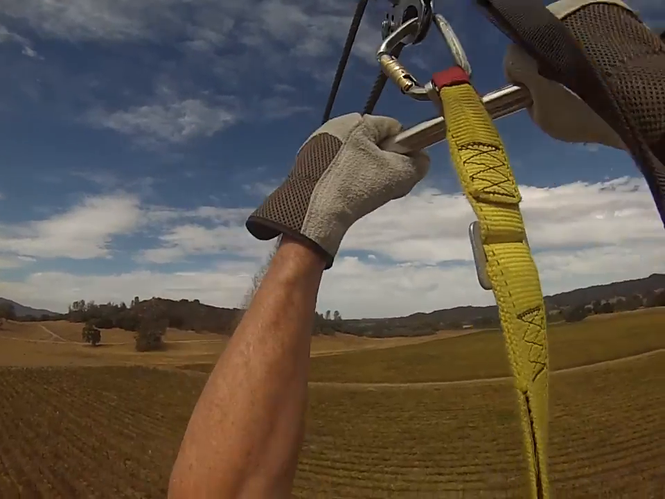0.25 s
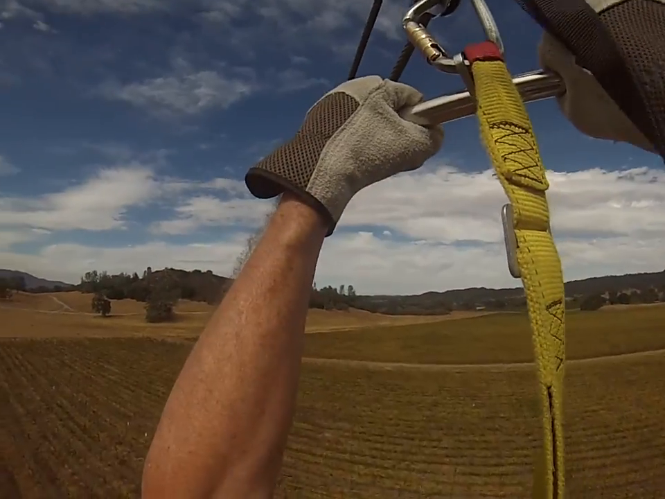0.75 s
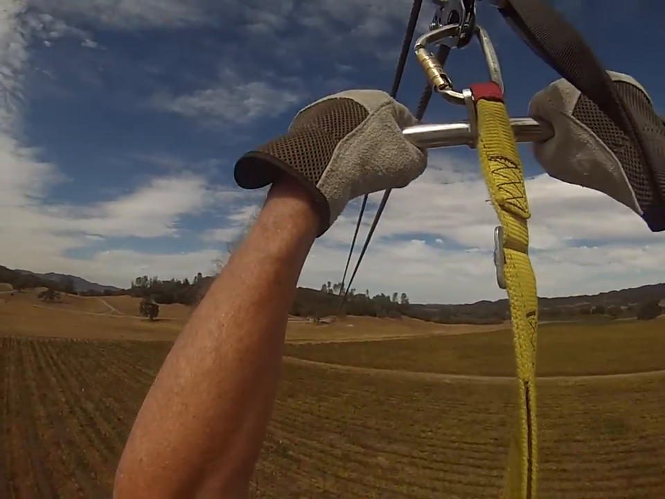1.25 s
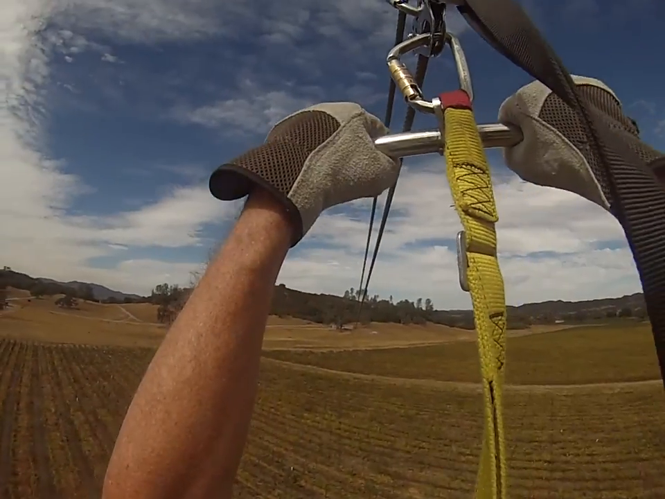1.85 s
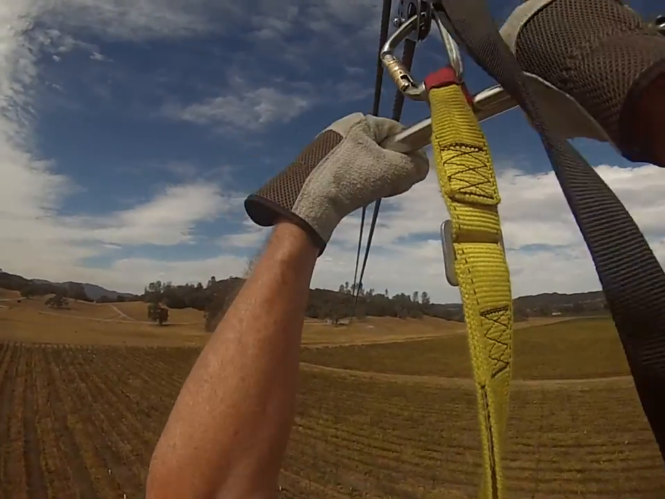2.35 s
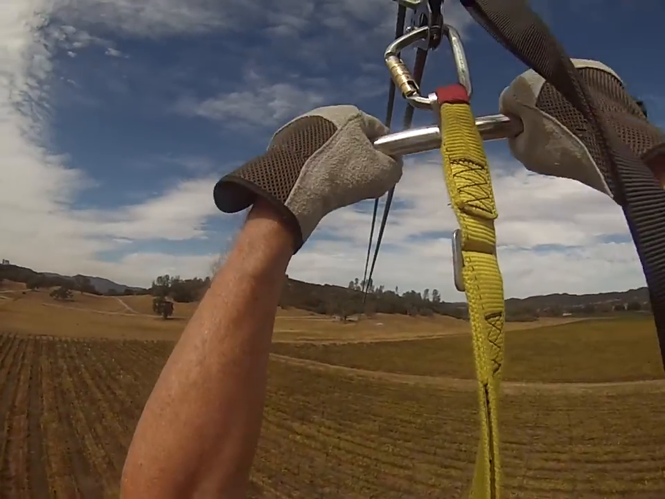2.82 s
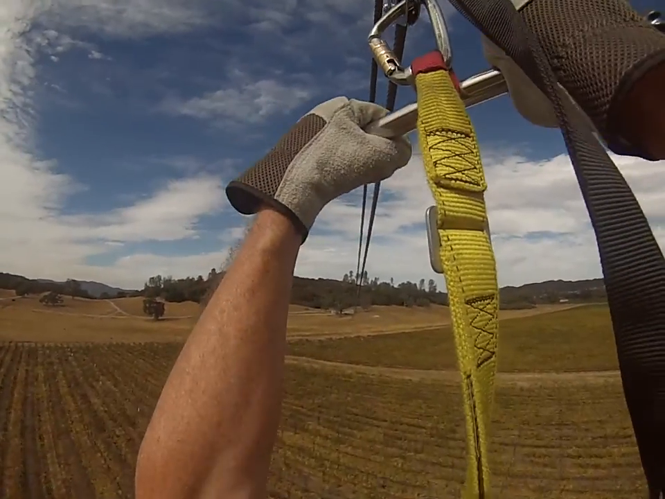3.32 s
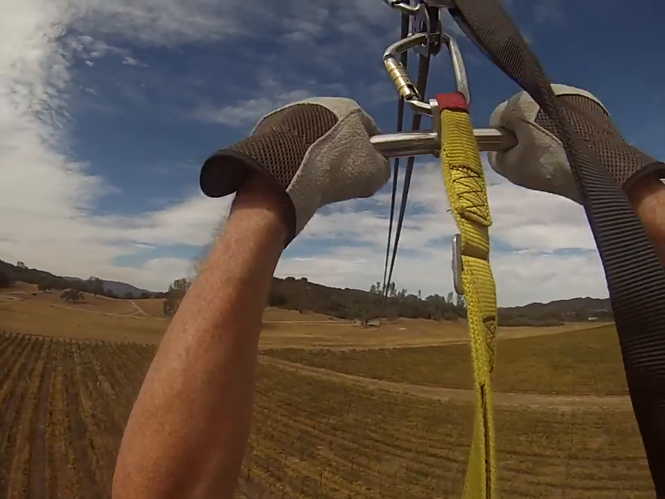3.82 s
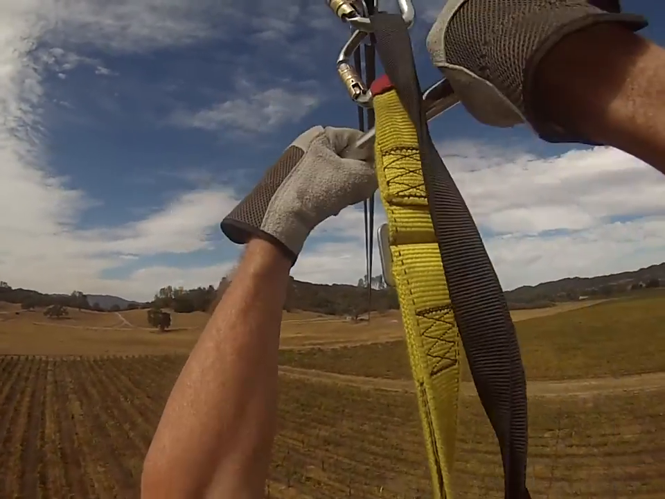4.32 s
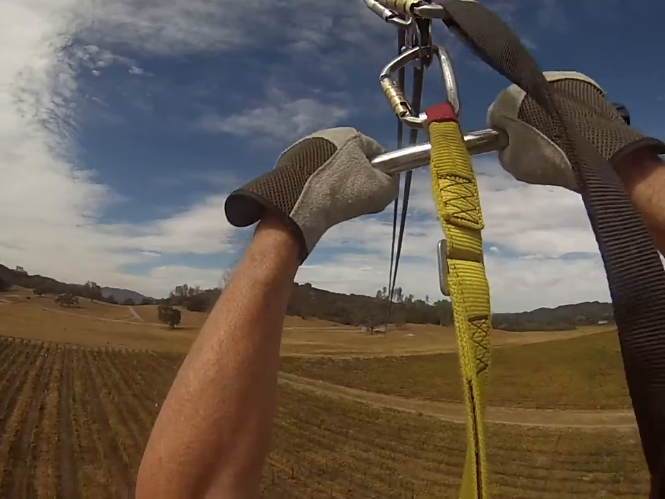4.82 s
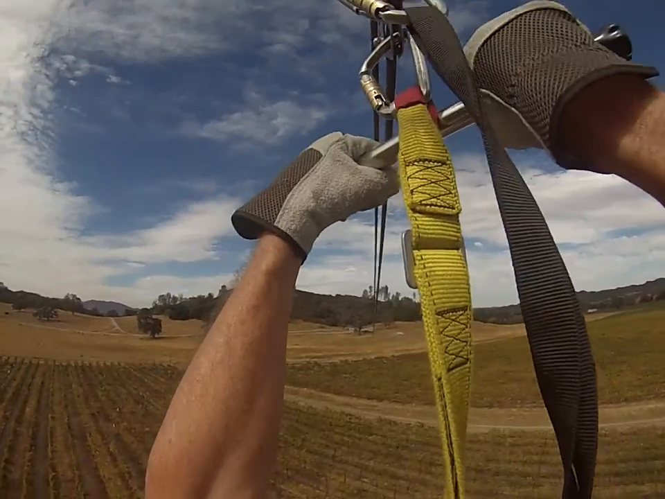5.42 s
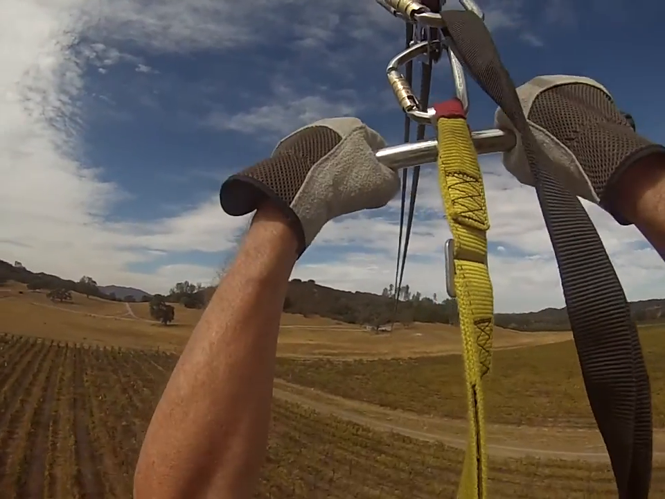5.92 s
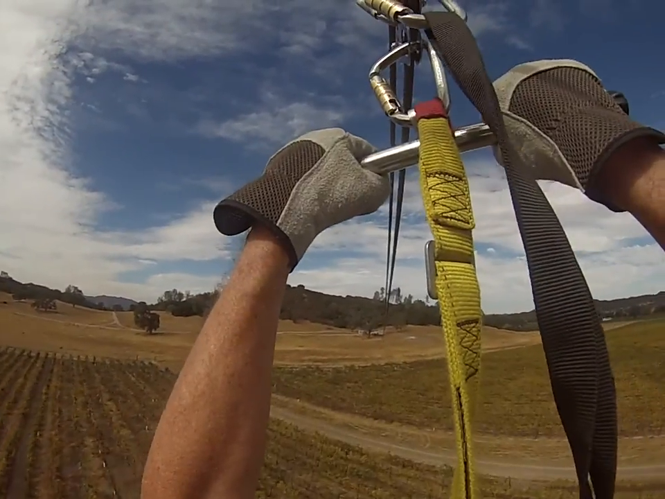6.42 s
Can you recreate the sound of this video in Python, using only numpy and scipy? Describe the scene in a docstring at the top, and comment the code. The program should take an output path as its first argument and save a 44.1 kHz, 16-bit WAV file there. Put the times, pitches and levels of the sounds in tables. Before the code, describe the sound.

Fast zip-line pulleys hiss steadily along a steel cable while wind rumbles and rasps on the microphone; one sharp knock briefly dips everything.

```python
"""Steel cable, heard from a helmet camera in a plastic case: a zip-line trolley runs fast along it.
Noise through resonances and a broad scrape makes the pulley hiss; strand-rate harmonics, a faint whine.
Short airy swishes flare over it. Wind noise rumbles on the case and rings its shell into a rasp.
One sharp knock, a noise crack plus decaying sines, makes the limiter duck everything for about a second."""
import sys
import numpy as np
from scipy import signal
from scipy.fft import rfft, irfft
from scipy.io import wavfile
from scipy.ndimage import uniform_filter1d, minimum_filter1d

SR = 44100
rng = np.random.default_rng(int(sys.argv[2]) if len(sys.argv) > 2 else 0)


def waveform_to_disk(signal):
    """Save audio, clipped to [-1, 1], as 16-bit WAV at the path in sys.argv[1]."""
    frames = np.transpose(np.atleast_2d(signal))
    scaled = np.clip(frames, -1, 1) * 32767
    samples = np.round(scaled).astype(np.int16)
    wavfile.write(sys.argv[1], SR, samples)


N = 293706
T = np.arange(N) / SR  # s


def undb(db):
    """Decibels to amplitude gain."""
    return 10 ** (np.asarray(db) / 20)


def unit(x):
    """Scale to rms 1."""
    return x / np.sqrt(np.mean(x ** 2))


def noise():
    """White noise, rms about 1."""
    return rng.standard_normal(N)


def curves(rows):
    """Each column of a time table, joined by straight lines."""
    t_s, *columns = np.transpose(rows)
    return [np.interp(T, t_s, column) for column in columns]


def walk(rate_hz):
    """Smooth random fluctuation, rms 1, low-passed at about rate_hz."""
    f_hz = np.arange(N // 2 + 1) * SR / N
    spectrum = rfft(noise()) / (1 + (f_hz / rate_hz) ** 2)
    return unit(irfft(spectrum, N))


def colour(x, points):
    """Filter by (f/Hz, level/dB) points, interpolated over log frequency; rms 1."""
    f_hz, level_db = np.transpose(points)
    bins_hz = np.arange(1, N // 2 + 2) * SR / N  # one bin up, avoids log(0)
    gain = undb(np.interp(np.log(bins_hz), np.log(f_hz), level_db))
    return unit(irfft(rfft(x) * gain, N))


def resonate(x, f_hz, width_hz, order=1):
    """Resonance with gain 1 at its centre; order 2 has steep skirts."""
    # each pass is widened, since cascading narrows the peak
    b, a = signal.iirpeak(f_hz, f_hz / (width_hz * np.sqrt(order)), fs=SR)
    for _ in range(order):
        x = signal.lfilter(b, a, x)
    return x


def swell(peak_s, half_s):
    """Gaussian rise and fall that peaks at 1."""
    return np.exp(-((T - peak_s) / half_s) ** 2)


def follow(strength_db, law):
    """Gain of a sound that grows as a power of its drive and drifts along the ride."""
    db, slope, db_per_s = law
    return undb(db + slope * strength_db + db_per_s * T)


def ring(modes, sway_db, flicker_db):
    """Rolling contact keeps each mode ringing; its share shifts as the trolley sways."""
    out = 0
    for f_hz, width_hz, db in modes:
        level_db = db + sway_db * walk(3.2) + flicker_db * walk(28)
        out = out + resonate(noise() * undb(level_db), f_hz, width_hz, order=2)
    return unit(out)


def pulleys():
    """Steel wheels on twisted wire: ringing modes over a broad scrape, shaken together by the uneven cable."""
    # how hard the pulleys bear on the cable as the rider sways: t/s, hiss drive/dB
    bearing = [(0, -15.5), (.24, -21), (.4, -18.5), (.54, -20.5), (.74, -21), (.88, -18), (1.05, -19),
               (1.55, -17), (2.1, -17.5), (2.55, -19.5), (2.82, -16), (3.08, -19), (3.85, -15.5),
               (4.38, -17.5), (4.55, -15), (4.97, -16), (5.6, -14), (6.35, -17.5)]
    # pulleys and side plates: f/Hz, width/Hz, relative level/dB at t = 0, rise/(dB/s) as the ride speeds up
    trolley_modes = [(3250, 480, -13.5, 0.5), (4410, 360, -9.5, 0.44), (4588, 126, -2, -0.16),
                     (5078, 280, -1, -0.01), (5741, 130, 3, 0), (6136, 470, -1, 0), (6610, 270, 0, 0),
                     (6775, 180, -2.5, 0.5), (7620, 730, -14, 0.88), (8700, 400, -13.5, .5),
                     (9470, 860, -17, -0.08)]
    # steel on steel: f/Hz, relative level/dB
    scrape_spectrum = [(500, -41), (1100, -5), (2200, 0), (3400, 4), (3950, 0), (5500, 2.5), (8000, -14),
                       (11000, -19), (16000, -19)]
    # highest trolley modes: f/Hz, width/Hz, relative level/dB
    sizzle_modes = [(10840, 360, -1), (11970, 750, 0.5), (13510, 540, -4), (14410, 370, 3.5),
                    (15040, 590, -14)]
    # sizzle against hiss: level/dB at 0 dB hiss, slope/(dB/dB), drift/(dB/s)
    sizzle_law = (-25, 0.58, -0.17)

    hiss_db, = curves(bearing)
    modes = [(f_hz, width_hz, db + rise_db * T) for f_hz, width_hz, db, rise_db in trolley_modes]
    ringing = ring(modes, sway_db=1.37, flicker_db=0.62)
    scrape = undb(-12.5) * colour(noise(), scrape_spectrum)
    hiss = (ringing + scrape) * undb(hiss_db)
    sizzle = ring(sizzle_modes, sway_db=1.5, flicker_db=1.1) * follow(hiss_db, sizzle_law)
    chatter = undb(0.21 * walk(76))
    return chatter * (hiss + sizzle)


def whine():
    """Strands tick past the pulleys fast enough to make a wavering tone."""
    # mean rate of strands passing, from the ride speed: t/s, f/Hz
    strand_rate = [(0, 1018), (5.1, 1046), (5.5, 1072), (6.1, 1074), (6.66, 1091)]
    # the whine comes and goes: t/s, relative level/dB
    whine_level = [(0, -39), (4.3, -36), (4.62, -32), (4.9, -36), (5.67, -23), (6.0, -47), (6.26, -29.5),
                   (6.42, -34.5), (6.54, -23)]
    # first three harmonics: relative level/dB
    partials_db = [-15.5, -6.5, 5.5]

    (rate_hz,), (level_db,) = curves(strand_rate), curves(whine_level)
    wavering_hz = rate_hz * (1 + 0.004 * walk(82.0))
    phase = 2 * np.pi * np.cumsum(wavering_hz) / SR
    tone = sum(undb(db) * np.sin(k * phase) for k, db in enumerate(partials_db, 1))
    return unit(tone) * undb(level_db + 3.5 * walk(40) - 2.5)


def swishes():
    """Now and then the rolling flares into a short, airy swish of coloured noise."""
    # t/s at the peak, half length/s, level/dB
    flares = [(0.376, .075, -25.5), (2.78, 0.098, -36), (3.85, 0.18, -35), (4.774, .1, -35)]
    # f/Hz, relative level/dB
    swish_spectrum = [(2000, -28), (5000, -6), (7500, 6), (9500, -2), (10700, -9), (12200, -1), (13200, -8),
                      (15500, -12)]

    envelope = sum(undb(db) * swell(peak_s, half_s) for peak_s, half_s, db in flares)
    return colour(noise(), swish_spectrum) * envelope


def knock():
    """A brief bright crack on the case, which rings for a few milliseconds."""
    # t/s, peak level/dB, decay time of the crack/s
    knock_settings = (4.9932, 11.1, 0.00064)
    # knocked case: f/Hz, decay time/s, relative level/dB
    case_modes = [(1500, 0.0016, -1.5), (2650, 0.0067, -21), (3490, 0.00084, 0)]
    # f/Hz, relative level/dB
    crack_spectrum = [(800, -23), (2500, -5), (7000, 16), (15000, -3), (18000, -25)]

    start_s, peak_db, crack_decay_s = knock_settings
    age_s = np.maximum(T - start_s, 0)
    shell = sum(undb(db) * np.exp(-age_s / decay_s) * np.sin(2 * np.pi * f_hz * age_s)
                for f_hz, decay_s, db in case_modes)
    crack = (T > start_s) * np.exp(-age_s / crack_decay_s) * colour(noise(), crack_spectrum)
    hit = np.tanh(2.0 * shell + 2.9 * crack)  # so close that it overloads the microphone
    # the hit carries no bass below about 900 Hz
    hit = signal.sosfilt(signal.butter(2, 900, "high", fs=SR, output="sos"), hit)
    return undb(peak_db) * hit / np.abs(hit).max()


def wind():
    """Eddies press on the case; each also sets off a burst of fine turbulence that rings the shell."""
    # airflow as the rider swings in and out of the wind: t/s, strength/dB
    airflow = [(0, -4), (.35, -4), (.55, -2), (1.12, -1), (1.58, -6.5), (2.08, -4.5), (2.38, 1), (2.62, 2),
               (2.78, -1.5), (2.98, 1.5), (3.4, -0.5), (3.78, -6), (4.35, -7.5), (4.62, -3.5), (5.03, -6.5),
               (5.85, -6.5), (6.02, -0.5), (6.2, -6.5)]
    # buffets on the case: t/s at the peak, half length/s, extra deep rumble/dB, extra flutter/dB
    buffets = [(0.22, 0.17, 4.5, 2.5), (0.476, 0.12, -3, 3), (1.713, 0.1, 5, 2), (2.283, .06, 2.5, 5.5),
               (3.247, 0.28, 2.5, 2.5), (4.43, .07, 4, 3), (4.917, 0.034, 0.5, 4), (5.418, 0.42, 2.5, 5)]
    # wind pressure on the case: f/Hz, relative level/dB
    rumble_spectrum = [(15, -49), (28, -10), (45, -2), (66, 1.5), (85, -2.5), (115, -6.5), (160, -13),
                       (240, -17.5), (340, -17.5), (460, -29), (620, -25), (850, -37), (1500, -29),
                       (4000, -50.5)]
    # plastic case: f/Hz, width/Hz, relative level/dB
    shell_modes = [(1520, 240, 1.5), (1990, 460, -4), (2336, 400, -9), (2652, 330, 1.5), (3173, 250, 6),
                   (3530, 230, -2.5)]
    # each law: level/dB at strength 0 dB, slope/(dB/dB), drift/(dB/s)
    rumble_law = (-17.5, 0.53, -0.64)
    low_rasp_law = (-26, 1.28, -0.12)
    upper_rasp_law = (-24, 0.93, -0.36)

    strength_db = curves(airflow)[0] + 0.5 * walk(3.5)
    eddies = walk(50)

    pressure = colour(noise() * undb(1.22 * eddies), rumble_spectrum)
    deep = signal.sosfiltfilt(signal.butter(3, 100, fs=SR, output="sos"), pressure)
    flutter = pressure - deep
    deep_db = sum(db * swell(peak_s, half_s) for peak_s, half_s, db, _ in buffets)
    flutter_db = sum(db * swell(peak_s, half_s) for peak_s, half_s, _, db in buffets)
    rumble = deep * undb(deep_db) + flutter * undb(flutter_db)

    bursts = undb(2.0 * eddies + 1.04 * walk(270))
    low, *upper = [undb(db) * resonate(bursts * noise(), f_hz, width_hz, order=2)
                   for f_hz, width_hz, db in shell_modes]
    low_rasp = unit(low) * follow(strength_db, low_rasp_law)
    upper_rasp = unit(sum(upper)) * follow(strength_db, upper_rasp_law)
    return rumble * follow(strength_db, rumble_law) + low_rasp + upper_rasp


def scene():
    """Everything reaches one microphone, written to both channels."""
    mono = pulleys() + whine() + swishes() + knock() + wind()
    return np.array([mono, mono])


def limiter(x, ceiling_db, ahead_s, hold_s, recovery_db_per_s):
    """Looks ahead, turns down at once for a peak, holds, then creeps back up."""
    over_db = np.maximum(20 * np.log10(np.abs(x).max(axis=0) + 1e-9) - ceiling_db, 0)
    ahead, half_hold = int(ahead_s * SR), int(hold_s * SR) // 2
    early_db = np.pad(over_db, (0, ahead))[ahead:]
    # running maximum over the past hold_s
    held_db = -minimum_filter1d(-early_db, 2 * half_hold + 1, origin=half_hold, mode="constant")
    ramp_db = recovery_db_per_s * T
    cut_db = np.maximum.accumulate(held_db + ramp_db) - ramp_db  # falls at the recovery rate
    return x * undb(-uniform_filter1d(cut_db, size=64))


def record(dry):
    """The camera limits the level and cuts the top above 15.3 kHz."""
    limited = limiter(dry, ceiling_db=0, ahead_s=0.0046, hold_s=0.2, recovery_db_per_s=11.2)
    return signal.sosfilt(signal.ellip(10, 0.1, 80, 15300, fs=SR, output="sos"), limited)


dry = scene()
out = record(dry)
waveform_to_disk(out)
```